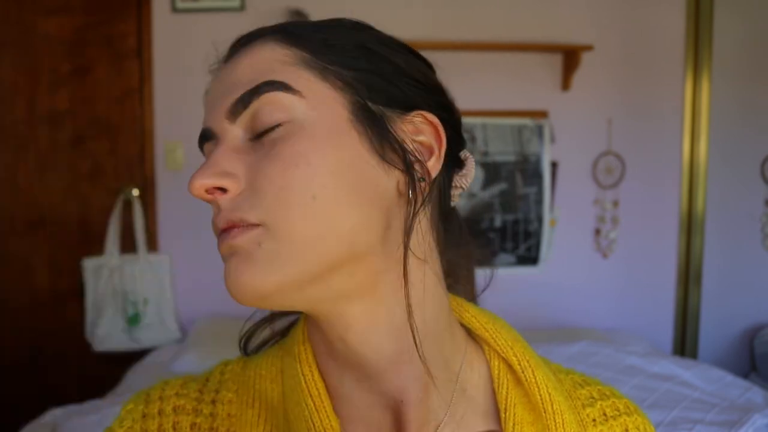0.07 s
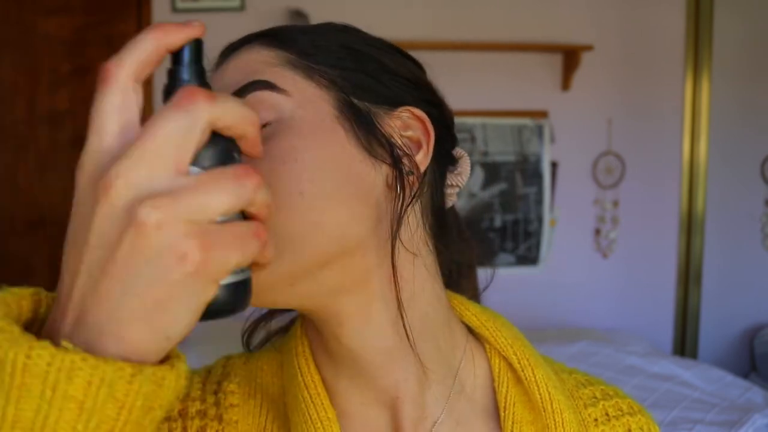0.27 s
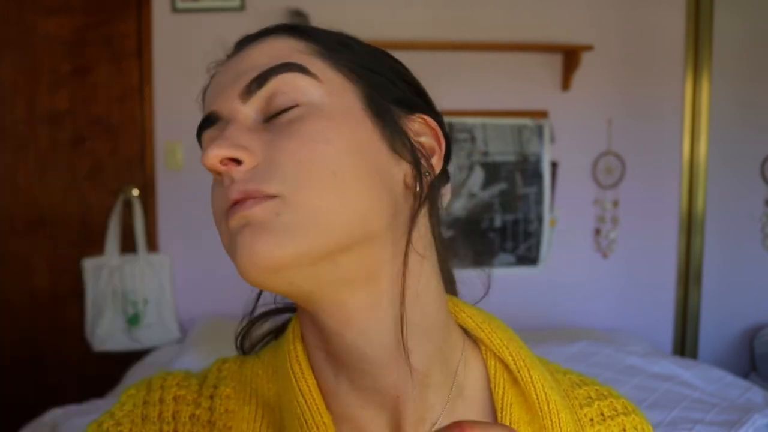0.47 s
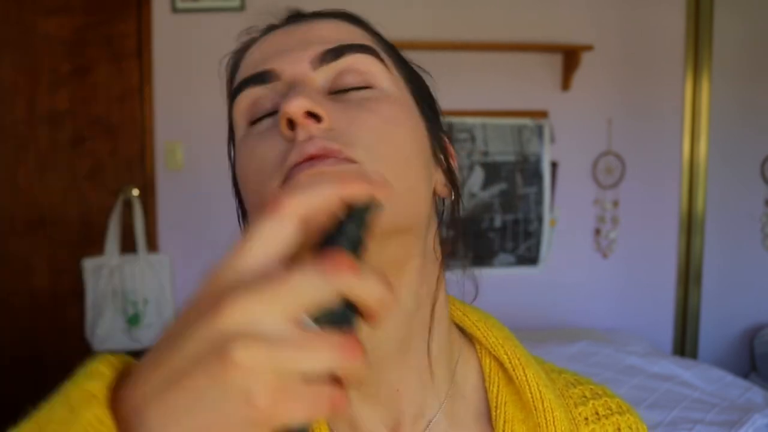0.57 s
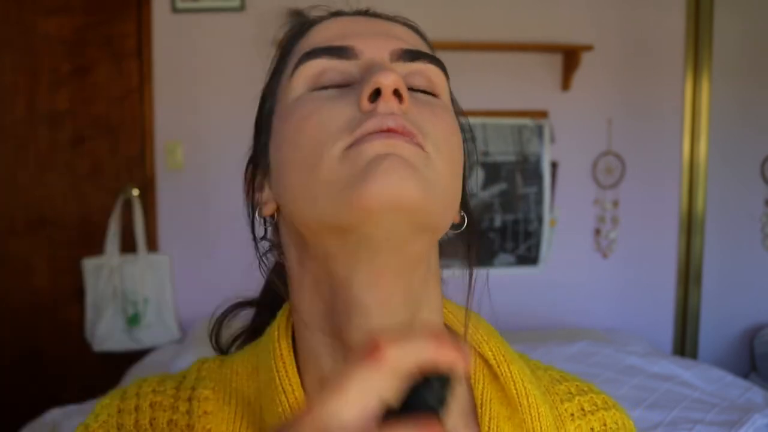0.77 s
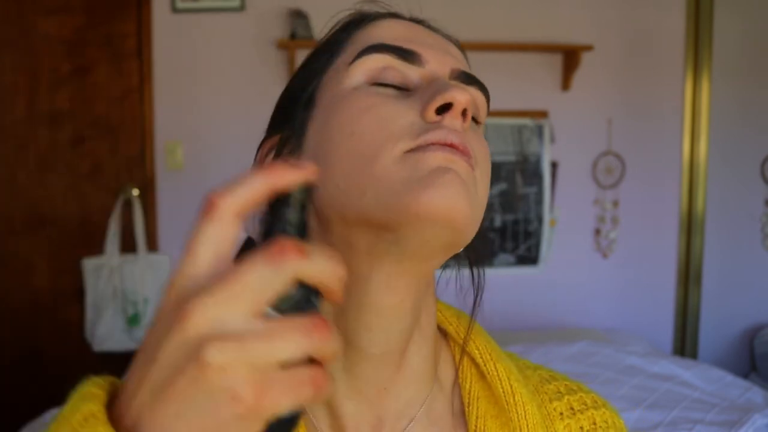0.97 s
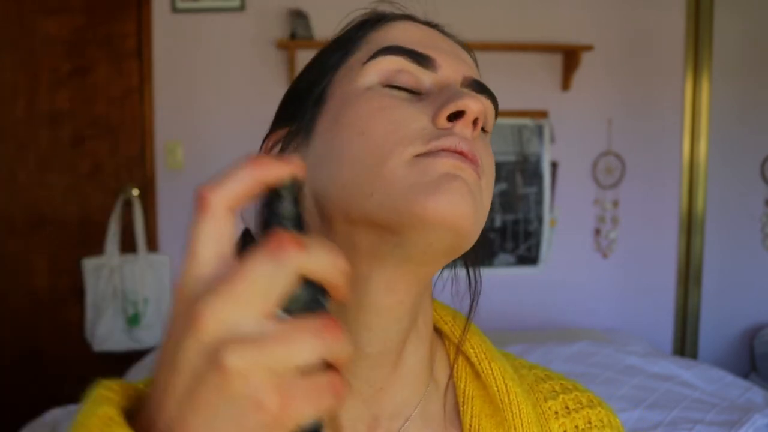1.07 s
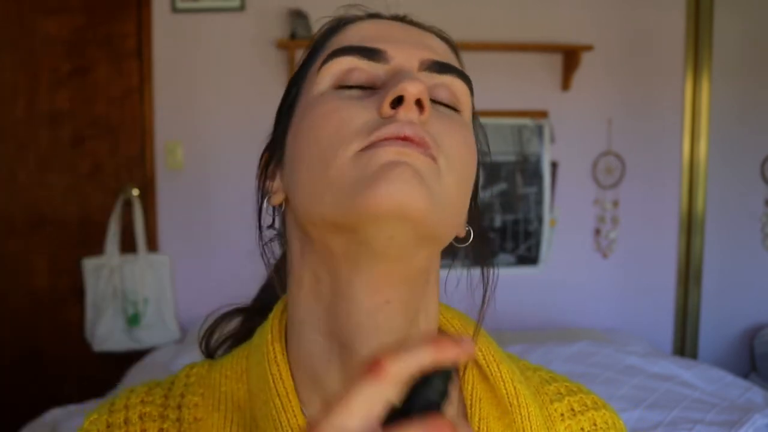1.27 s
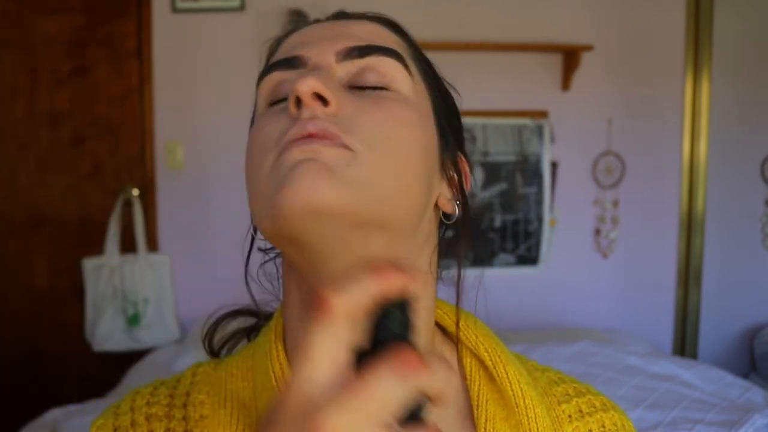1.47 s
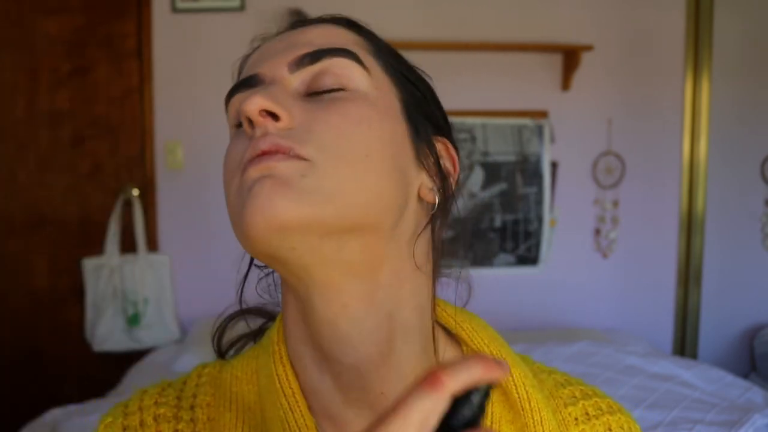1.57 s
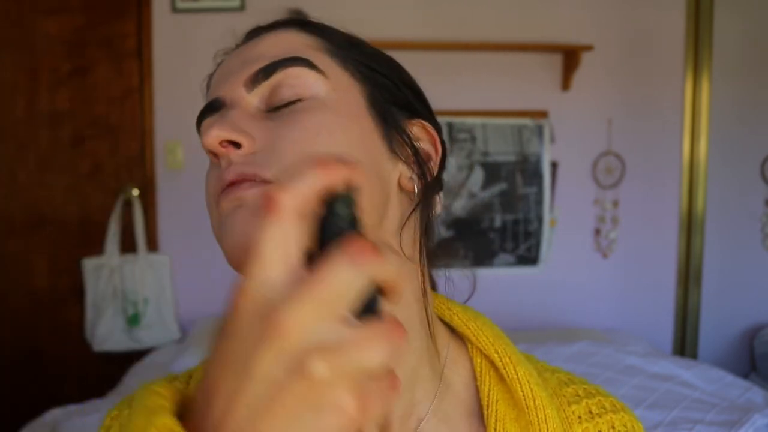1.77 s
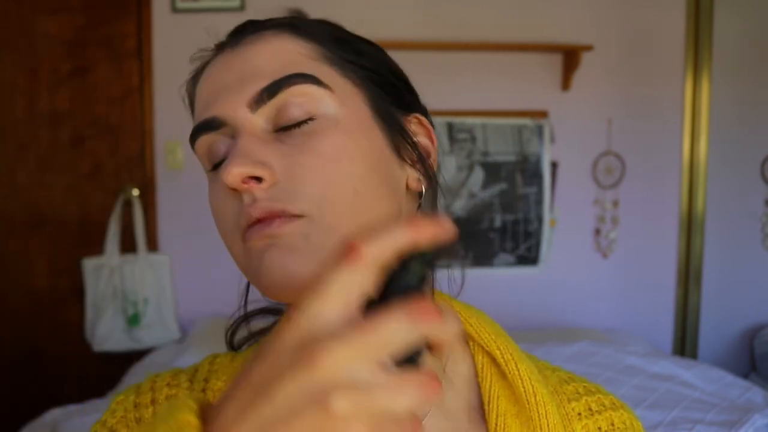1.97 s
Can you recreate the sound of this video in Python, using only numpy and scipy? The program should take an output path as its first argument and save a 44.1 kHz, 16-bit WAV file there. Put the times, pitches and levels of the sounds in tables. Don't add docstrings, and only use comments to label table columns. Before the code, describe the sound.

A hand-pumped spray bottle hisses six quick bursts of fine mist, liquid plopping and sloshing inside

```python
import sys
import numpy as np
from scipy import signal
from scipy.fft import rfft, irfft
from scipy.io import wavfile
from scipy.ndimage import uniform_filter1d

SR = 44100
rng = np.random.default_rng(int(sys.argv[2]) if len(sys.argv) > 2 else 0)


def volts_from_decibels(level):
    exponent = np.asarray(level, float) / 20
    return 10 ** exponent


def generate_wav(signal):
    frames = np.transpose(np.atleast_2d(signal))
    scaled = np.clip(frames, -1, 1) * 32767
    pcm = np.round(scaled).astype(np.int16)
    wavfile.write(sys.argv[1], SR, pcm)


N = 88817
SIDES = np.array([[1], [-1]])


def level(x, rms_db):
    return x * volts_from_decibels(rms_db) / np.sqrt(np.mean(x ** 2))


def colour(x, points):
    freq_hz, gain_db = np.array(points, float).T
    bin_hz = np.fft.rfftfreq(N, 1 / SR) + 1
    gain = volts_from_decibels(np.interp(np.log(bin_hz), np.log(freq_hz), gain_db))
    return irfft(rfft(x) * gain, N)


def butter(x, order, hz, kind="low"):
    return signal.sosfilt(signal.butter(order, hz, kind, fs=SR, output="sos"), x)


def pan(left_minus_right_db):
    return volts_from_decibels(np.array([left_minus_right_db / 2, -left_minus_right_db / 2]))


def add(out, start_s, sound):
    i = min(max(int(start_s * SR), 0), N - 1)
    out[i:i + len(sound)] += sound[:N - i]


# freq_hz, density_db (per Hz)
ROOM_SPECTRUM = [(12, -31), (20, -2), (165, 2), (465, 2), (1430, -31), (2310, -12.5), (13200, -23),
                 (15200, -59), (16500, -56)]
# freq_hz, width_hz, level_db
HUMS = [
    (61, 5.9, -57),
    (78.15, 1.7, -61),
]
ROOM_DB = -47.5


def room_tone():
    mid, side = (colour(rng.standard_normal(N), ROOM_SPECTRUM) for _ in range(2))
    side = colour(side, [(60, -4.5), (250, -7.5), (2000, 0), (8000, 7)])
    out = level(mid + side * SIDES, ROOM_DB)
    for freq_hz, width_hz, hum_db in HUMS:
        peak = signal.iirpeak(freq_hz, freq_hz / width_hz, fs=SR)
        out = out + level(signal.lfilter(*peak, rng.standard_normal(N)), hum_db)
    return out


# delay_s, left_db, right_db
NEAR_WALLS = [
    (.0058, -25, -17),
    (.0188, -24, -17),
]
WALL_DB, WALL_GAP_S = -2.5, 0.003
T60_LOW_S, T60_HIGH_S, DAMP_HZ = 0.3, 0.11, 3770


def walls(x):
    t = np.arange(20000) / SR
    mid, side = rng.standard_normal((2, 20000))
    noise = mid + butter(side, 2, 800, "high") * SIDES
    noise = butter(noise, 1, 700, "high")
    low = butter(noise, 2, DAMP_HZ)
    low_tail = low * volts_from_decibels(-60 * t / T60_LOW_S)
    high_tail = 0.85 * (noise - low) * volts_from_decibels(-60 * t / T60_HIGH_S)
    echo = (low_tail + high_tail) * np.clip(t / WALL_GAP_S - 0.5, 0, 1)
    echo *= volts_from_decibels(WALL_DB) / np.sqrt(np.sum(low_tail[0] ** 2) * SR / 2 / DAMP_HZ)
    for delay_s, left_db, right_db in NEAR_WALLS:
        echo[:, int(delay_s * SR)] += volts_from_decibels(np.array([left_db, right_db]))
    return signal.fftconvolve(x.mean(axis=0)[None], echo, axes=1)[:, :N]


def bubble(pitch_hz, level_db, cycles, glide):
    length = min(int(2.5 * cycles * SR / pitch_hz) + 9, 2000)
    c = np.arange(length) / SR * pitch_hz
    swell = (1 - np.exp(-2 * c)) ** np.pi
    decay = np.exp(-np.log(1000) * c / cycles / 2)
    return volts_from_decibels(level_db) * swell * decay * np.sin(2 * np.pi * c * (1 + glide * c / cycles))


# start_s, level_db, pitch_hz, glide, cycles
PLOPS = [(.5175, -16, 1200, 0.069, 2.2), (.5198, -9, 2220, .03, 7), (.5188, -17, 980, 0.03, 6),
         (.5180, -23, 580, 0.03, 6), (.5199, -13, 1760, .02, 7), (.5230, -27, 790, .02, 6),
         (.5370, -31, 600, .02, 7), (.5200, -22.5, 3120, .02, 9.4), (.5250, -19, 2350, 0.018, 11),
         (1.2460, -22, 1740, 0.015, 7.4), (1.2533, -16, 1500, 0.1, 8), (1.2528, -18, 1100, .04, 7),
         (1.2520, -32, 510, 0.03, 5), (1.2548, -22, 2050, .04, 14), (1.2640, -22, 1040, 0.02, 8),
         (1.2620, -26, 2200, .01, 14), (1.2625, -24, 1500, .03, 7), (1.2620, -31, 515, .02, 5),
         (1.6114, -3, 1950, 0.2, 9), (1.6108, -14, 1150, 0.1, 5), (1.6095, -31, 510, 0.03, 5),
         (1.6114, -13, 1620, .05, 6), (1.6115, -42, 3200, .02, 9), (1.7815, -35, 1543, .01, 28),
         (1.9579, -20.5, 1680, 0.13, 7.2), (1.9585, -23.5, 740, 0.058, 4.2),
         (1.9612, -14.5, 1900, 0.034, 9.9), (1.9615, -21, 1063, 0.05, 7.6),
         (1.9615, -25.5, 506, 0.025, 5.1), (1.9615, -24.5, 3100, .02, 11.4)]


def plops(out):
    for start_s, level_db, pitch_hz, glide, cycles in PLOPS:
        add(out, start_s, -bubble(pitch_hz, level_db + 6.5, cycles, glide))


# start_s, peak_db, pitch_hz
BUBBLES = [(0.094, -27.5, 2000), (0.107, -27.5, 1590), (0.126, -19, 2450), (0.151, -30, 2680),
           (0.176, -29, 2680), (0.205, -33.5, 2040), (0.278, -31, 3100), (0.317, -32, 1146),
           (0.334, -28, 1570), (0.372, -21, 3220), (0.436, -32, 2590), (0.475, -26, 1800),
           (0.563, -40, 2150), (0.702, -35, 3100), (0.768, -28.5, 1604), (0.862, -27, 1740),
           (0.881, -28, 1490), (0.903, -22.5, 2160), (0.927, -29, 2620), (0.974, -28, 2310),
           (1.071, -32.5, 1560), (1.216, -27.5, 2010), (1.367, -25, 2520), (1.38, -29, 1290)]
# start_s, peak_db, pitch_hz
MORE_BUBBLES = [(1.307, -28.5, 3370), (1.664, -32, 2460), (1.78, -34, 2200), (1.909, -36.5, 1100),
                (2.004, -28.5, 2970), (.085, -30, 2120), (.112, -30.5, 1560), (.309, -34, 1115),
                (.336, -36, 1020), (.349, -34, 1090), (.354, -30.5, 1500), (.373, -26.5, 1600),
                (.378, -36, 1200), (.485, -34, 1160), (.95, -28.5, 3400), (1.017, -32.5, 2720),
                (1.091, -28, 3430), (1.291, -35, 1200), (1.297, -31, 1690), (1.36, -35, 1100),
                (1.415, -37.5, 1020), (1.438, -34, 2330), (1.665, -35.5, 1240), (1.664, -36, 3500),
                (1.755, -34, 2630), (1.748, -38, 3300)]
BUBBLE_CYCLES, BUBBLE_GLIDE = 10.64, 0.048


def light_bubbles(out):
    light = list(BUBBLES) + list(MORE_BUBBLES)
    for (start_s, peak_db, pitch_hz), draws in zip(light, rng.random((50, 4))):
        add(out, start_s + 0.001032, bubble(pitch_hz, peak_db + 5.5, BUBBLE_CYCLES, BUBBLE_GLIDE))
        for late, up in draws.reshape(2, 2):
            follower = bubble(pitch_hz * (0.814 + 0.25 * up), peak_db - 7, BUBBLE_CYCLES, BUBBLE_GLIDE)
            add(out, start_s + 0.003046 + 0.0095 * late, follower)


# start_s, peak_db, pitch_hz
GULPS = [(0.079, -39, 600), (0.126, -37.5, 530), (0.164, -36.5, 586), (0.675, -38.5, 715), (0.7, -41, 456),
         (0.719, -34.5, 950), (0.739, -38.5, 640), (0.766, -36, 1010), (0.876, -36.5, 496),
         (0.903, -27.5, 970), (1.401, -38.5, 560), (1.58, -37, 630), (1.887, -39.5, 600), (.448, -40, 560),
         (.564, -40, 670), (.969, -39, 460), (1.069, -39, 610), (1.051, -42, 595), (1.747, -43, 510),
         (1.92, -34, 1100)]


def gulps(out):
    for start_s, peak_db, pitch_hz in GULPS:
        add(out, start_s, bubble(pitch_hz, peak_db + 14, 4.23, 0.12))


# time_s, level_db
SHAKE = [(0, -62), (.1, -49.5), (.19, -45), (.225, -72), (.31, -46), (.35, -45.5), (.56, -46), (.64, -57),
         (.71, -42.5), (.95, -47), (1.04, -48), (1.1, -46), (1.199, -53), (1.4, -41.5), (1.552, -51.5),
         (1.72, -49.5), (1.85, -48), (2.01, -39)]
SLOSH_PER_S, SLOSH_DB, SLOSH_SPREAD_DB = 400, 5.5, 3
SLOSH_HZ, SLOSH_OCTAVES = 1300, 0.874


def slosh(out):
    gap, size, pitch = rng.random((1500, 3)).T
    shake_s, shake_db = np.array(SHAKE).T
    starts_s = np.cumsum(-np.log(gap) / SLOSH_PER_S)
    for start_s, extra, p in zip(starts_s, -np.log(size), pitch):
        if start_s < N / SR:
            level_db = np.interp(start_s, shake_s, shake_db) + SLOSH_DB + SLOSH_SPREAD_DB * extra
            pitch_hz = SLOSH_HZ * 2 ** (SLOSH_OCTAVES * (3 * p - 1.5))
            add(out, start_s, bubble(pitch_hz, level_db, 6.53, 0.22))


LIQUID_PAN_DB, LIQUID_PAN_HZ = -4, 930


def liquid():
    out = np.zeros(N)
    plops(out)
    light_bubbles(out)
    gulps(out)
    slosh(out)
    bass = butter(out, 1, LIQUID_PAN_HZ)
    return bass + (out - bass) * pan(LIQUID_PAN_DB)[:, None]


# start_s, peak_db, pitch_hz
TICKS = [(0.0024, -10.5, 9400), (0.1331, -28, 4730), (0.1615, -27, 7200), (0.1785, -22, 8000),
         (0.2703, -27, 7500), (0.3175, -27, 6760), (0.5188, -25.5, 6800), (0.5504, -28, 4600),
         (0.5678, -26, 7800), (0.658, -39, 5600), (0.6801, -15, 10500), (0.9445, -30, 9000),
         (0.9558, -24.5, 7900), (0.9734, -21, 6840), (1.0282, -28.5, 8000), (1.050, -34, 4580),
         (1.0695, -37, 9250), (1.3135, -25, 8800), (1.3235, -25, 8140), (1.3297, -24.5, 5090),
         (1.3424, -29, 7600), (1.3981, -15.5, 7000), (1.4054, -28, 7300), (1.6529, -26.5, 8300),
         (1.7804, -29, 4940)]
# start_s, peak_db, pitch_hz
MORE_TICKS = [(.6700, -30, 9500), (0.6764, -28, 4000), (1.3952, -21, 3900), (1.727, -33, 8950),
              (1.7493, -32.5, 8600), (.5875, -36, 8500), (0.18, -30, 5500), (0.23, -31, 4200),
              (0.43, -30, 5700), (.6812, -22, 4600), (.963, -27, 9200), (.993, -31, 8100),
              (1.013, -34, 7400), (1.365, -26, 4400), (.618, -38, 9000)]
# freq_hz, cycles
HEAD_MODES = [(3500, 6), (5600, 4), (7500, 5), (9200, 6), (11200, 6)]
SCRATCH_S, TICK_LATE_S = 0.0007, 0.0004
TICK_DB_PER_OCTAVE, TICK_PAN_DB = 22.5, -3.5


def valve():
    out, t = np.zeros(N), np.arange(150) / SR
    ticks = list(TICKS) + list(MORE_TICKS)
    for (start_s, peak_db, pitch_hz), noise in zip(ticks, rng.standard_normal((40, 150))):
        ring = 0
        for freq_hz, cycles in HEAD_MODES:
            mode_db = -TICK_DB_PER_OCTAVE * abs(np.log2(freq_hz / pitch_hz))
            ring = ring + bubble(freq_hz, mode_db, cycles, 0)[:60]
        burst = np.convolve(noise * np.exp(-t / SCRATCH_S), ring)
        add(out, start_s + TICK_LATE_S, volts_from_decibels(peak_db) * burst / np.abs(burst).max())
    return butter(out, 6, 12500) * pan(TICK_PAN_DB)[:, None]


def spit(per_s, spread_db):
    droplet_db = spread_db * np.minimum(rng.exponential(size=N), np.pi)
    size = volts_from_decibels(droplet_db)[(np.arange(N) * per_s / SR).astype(int)]
    return size * rng.standard_normal(N)


def walk(per_s):
    hold = int(SR / per_s)
    steps = rng.standard_normal(N)[np.arange(N) // hold]
    return 1.64 * uniform_filter1d(uniform_filter1d(steps, hold), hold)


# start_s, push_s, mist_db, refill_db
STROKES = [
    (-.07, 0.12, -31, -44.5),
    (0.315, 0.11, -29.5, -48),
    (0.699, 0.11, -28, -39.5),
    (1.067, 0.09, -28.5, -41),
    (1.42, 0.094, -30.5, -50),
    (1.773, 0.11, -33.5, -44),
]
# freq_hz, density_db (per Hz)
MIST_SPECTRUM = [(600, -26.5), (1500, -11), (3000, -5.5), (4800, -8), (7500, -2.5), (10000, -5),
                 (14000, -9.5), (16000, -20.5)]
# freq_hz, density_db (per Hz)
REFILL_SPECTRUM = [(1800, -23), (3400, 1.5), (4800, -5), (8000, -1), (12500, -15), (16000, -25)]
RISE_DB, RISE_S, RELEASE_DB_PER_S, KNEE_S = 26.5, 0.0091, 159, 0.024
SWELL_DB_PER_S = 46.5
REFILL_AFTER_S, REFILL_RISE_S, REFILL_FALL_S = 0.2576, 0.02, 0.042
PAN_START_DB, PAN_END_DB, PAN_TURN_S = -0.5, -5, 0.1
MIST_ALIKE_HZ, SPIT_PER_S, SPIT_DB = 7000, 5700, 1.5
CRACKLE_PER_S, CRACKLE_DB = 1400, 4
BRIGHT_HZ, BRIGHT_DB = 10500, -2


def pump():
    t = np.arange(N) / SR
    mist_gain, refill_gain, pan_db = np.zeros(N), np.zeros(N), np.zeros(N)
    for start_s, push_s, mist_db, refill_db in STROKES:
        begun = t >= start_s
        u = np.clip(t - start_s, 0, None)
        rise_db = -RISE_DB * np.exp(-u / RISE_S)
        swell_db = SWELL_DB_PER_S * (np.minimum(u, push_s) - push_s)
        release_db = -RELEASE_DB_PER_S * KNEE_S * np.logaddexp(0, (u - push_s) / KNEE_S)
        mist_gain += begun * volts_from_decibels(mist_db + rise_db + swell_db + release_db)
        v = t - start_s - REFILL_AFTER_S
        decay = np.where(v < 0, (v / REFILL_RISE_S) ** 2 / 2, v / REFILL_FALL_S)
        refill_gain += volts_from_decibels(refill_db) * np.exp(-decay)
        sweep_db = PAN_END_DB + (PAN_START_DB - PAN_END_DB) * np.exp(-(u / PAN_TURN_S) ** 2)
        pan_db = np.where(begun, sweep_db, pan_db)

    mid, side = (level(colour(spit(SPIT_PER_S, SPIT_DB), MIST_SPECTRUM), 0) for _ in range(2))
    side = butter(side, 1, MIST_ALIKE_HZ, "high")
    jet = (mid + side * SIDES) * mist_gain * volts_from_decibels(0.5 * walk(40.28))
    treble = butter(jet, 2, BRIGHT_HZ, "high")
    turned = (pan_db - PAN_START_DB) / (PAN_END_DB - PAN_START_DB)
    jet = jet + treble * (volts_from_decibels(BRIGHT_DB * turned) - 1)

    crackle = level(colour(spit(CRACKLE_PER_S, CRACKLE_DB), REFILL_SPECTRUM), 0)
    refill = crackle * refill_gain * volts_from_decibels(2 * walk(150))
    return (jet + refill) * pan(pan_db)


def scene():
    bottle = pump() + liquid() + valve()
    return bottle + walls(bottle) + room_tone()


def band_limit(x):
    return signal.sosfilt(signal.butter(12, 16820, fs=SR, output="sos"), x)


def record(dry):
    top_cut = signal.ellip(12, 0.3, 70, 15850, fs=SR, output="sos")
    mix = np.clip(signal.sosfilt(top_cut, dry), -1, 1)
    return band_limit(mix)


dry = scene()
out = record(dry)
generate_wav(out)
```